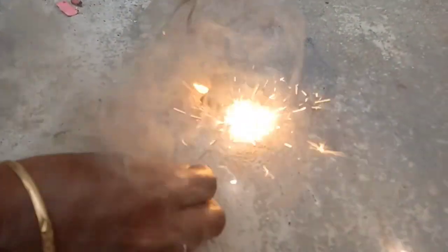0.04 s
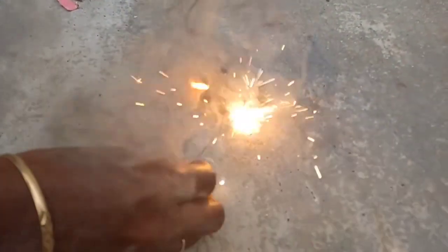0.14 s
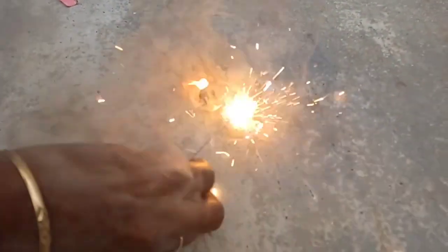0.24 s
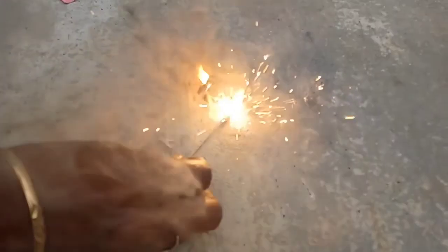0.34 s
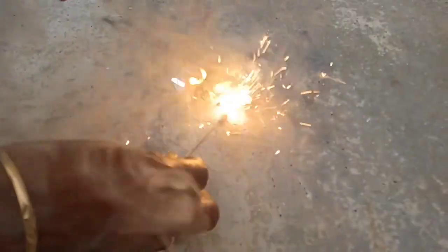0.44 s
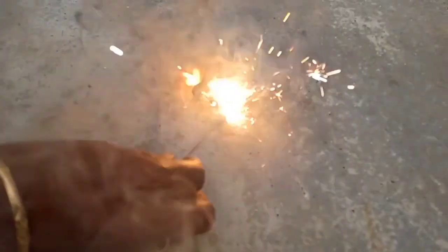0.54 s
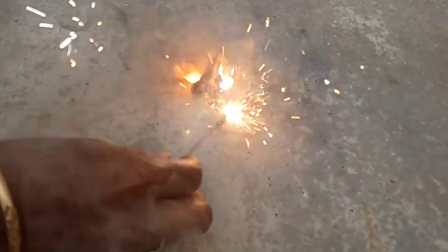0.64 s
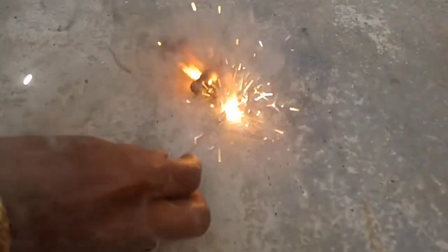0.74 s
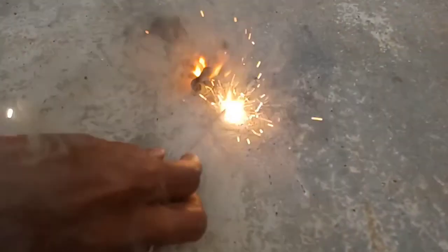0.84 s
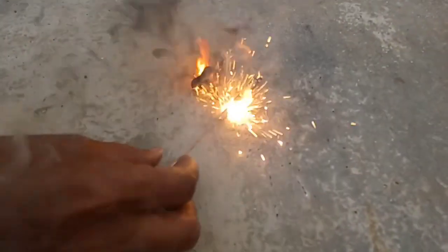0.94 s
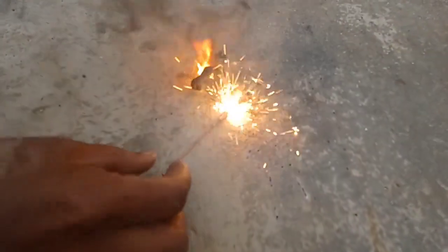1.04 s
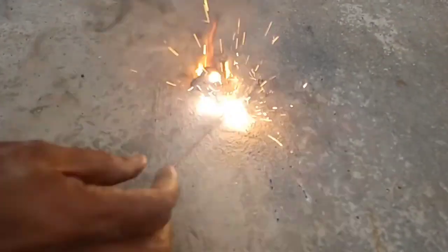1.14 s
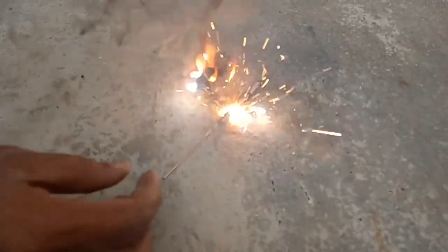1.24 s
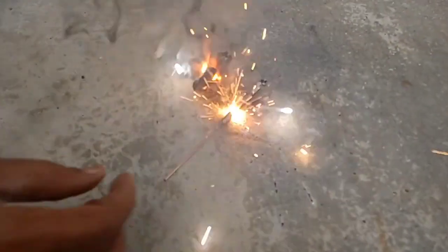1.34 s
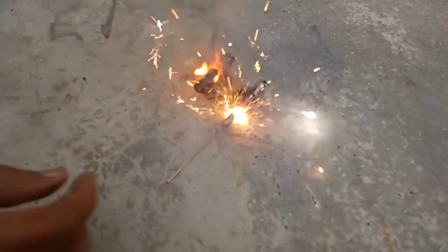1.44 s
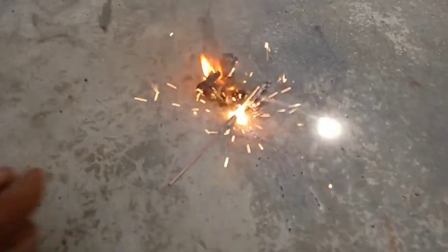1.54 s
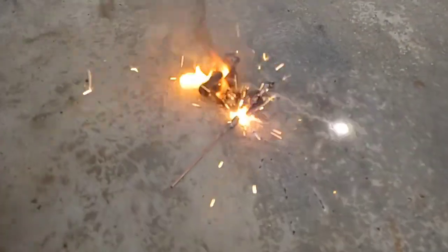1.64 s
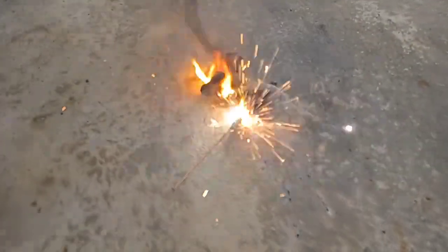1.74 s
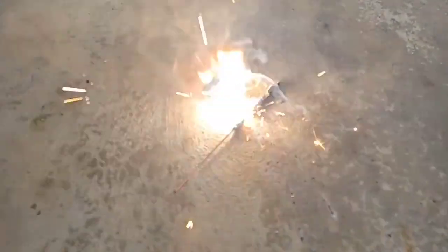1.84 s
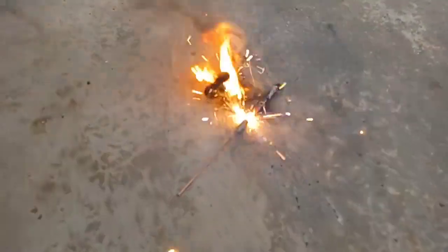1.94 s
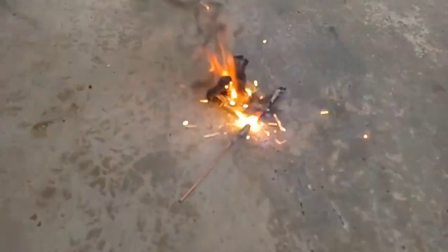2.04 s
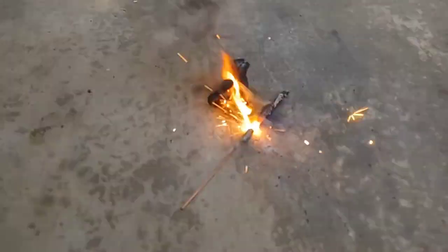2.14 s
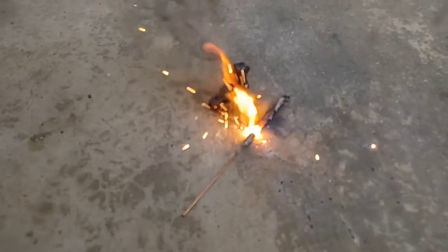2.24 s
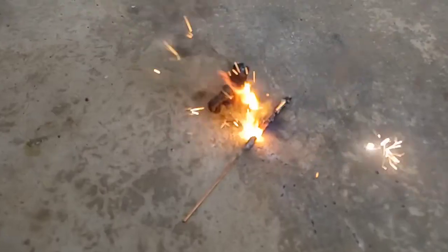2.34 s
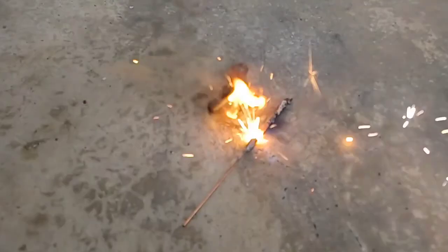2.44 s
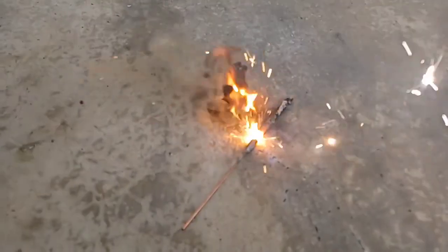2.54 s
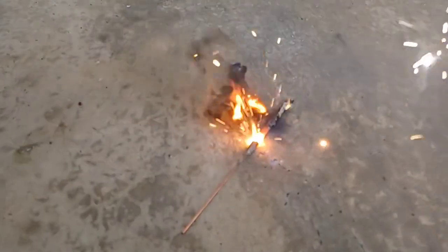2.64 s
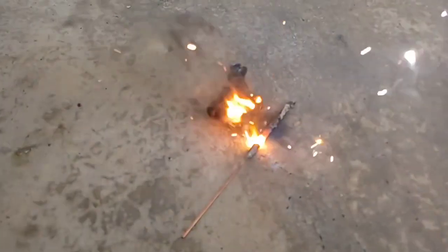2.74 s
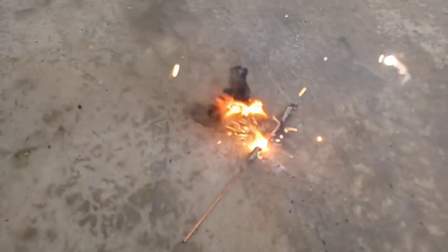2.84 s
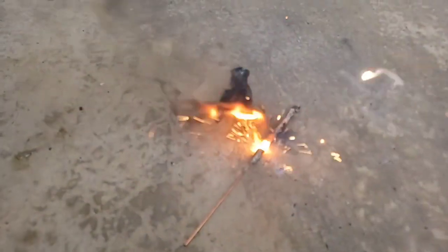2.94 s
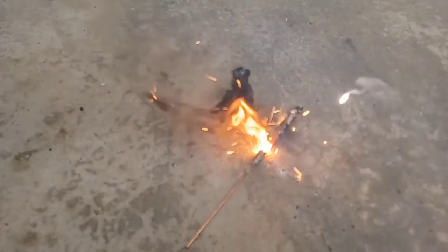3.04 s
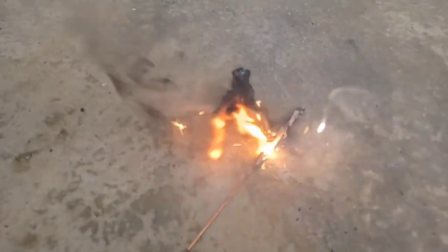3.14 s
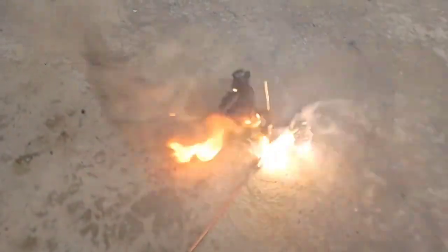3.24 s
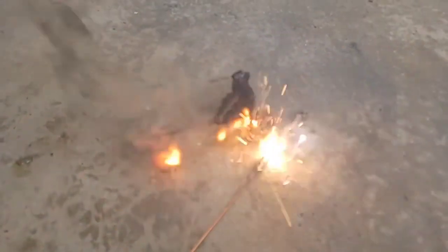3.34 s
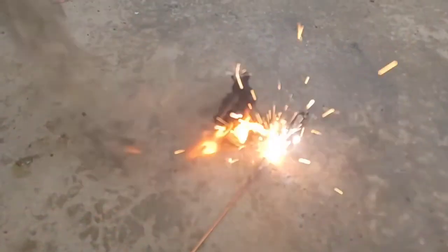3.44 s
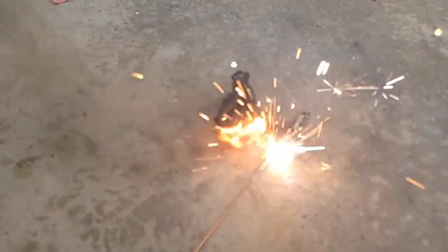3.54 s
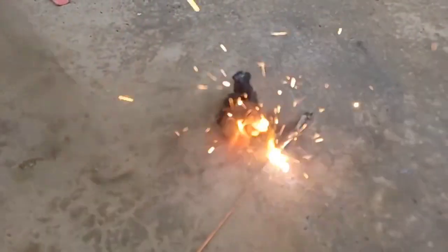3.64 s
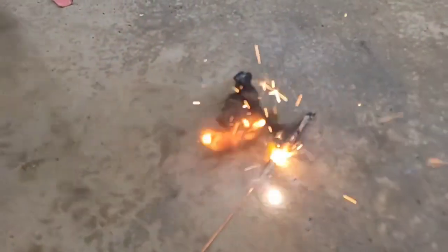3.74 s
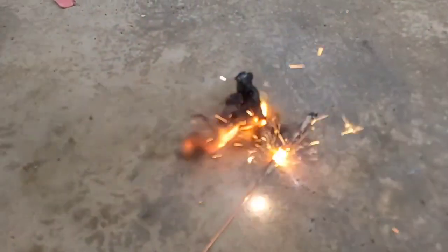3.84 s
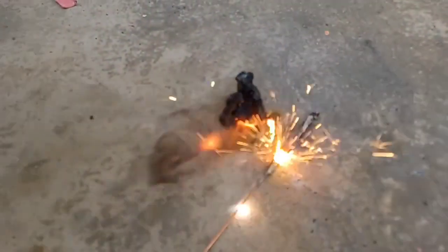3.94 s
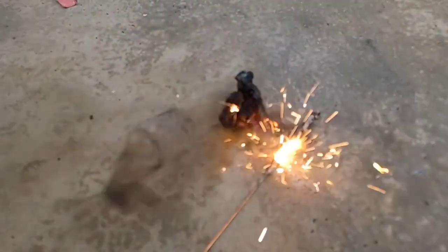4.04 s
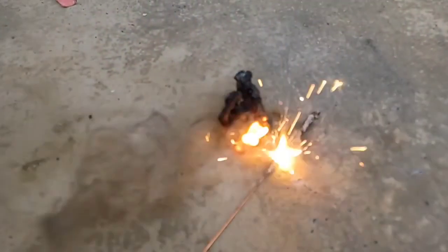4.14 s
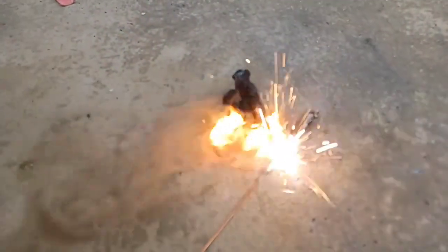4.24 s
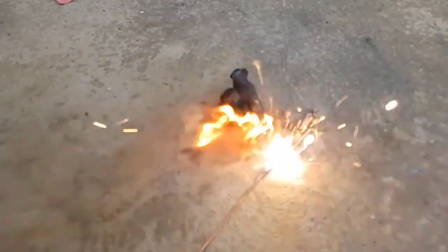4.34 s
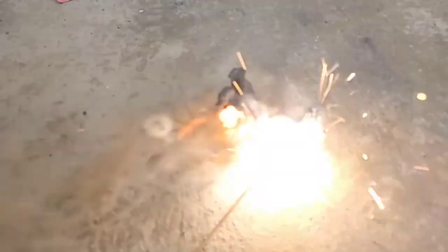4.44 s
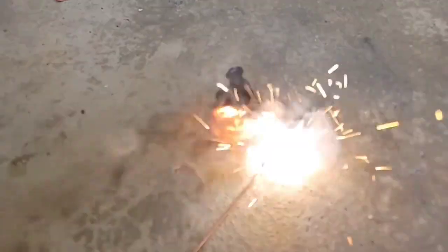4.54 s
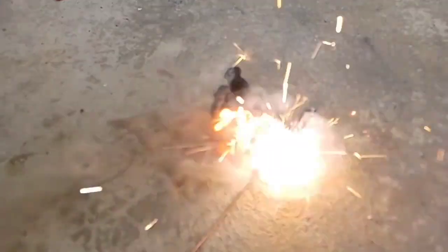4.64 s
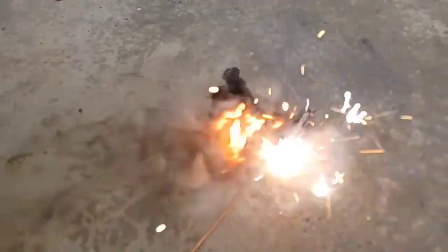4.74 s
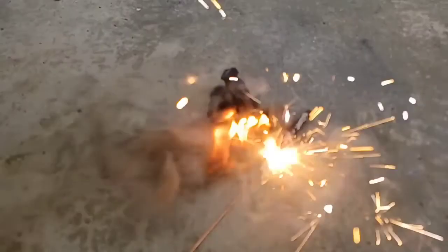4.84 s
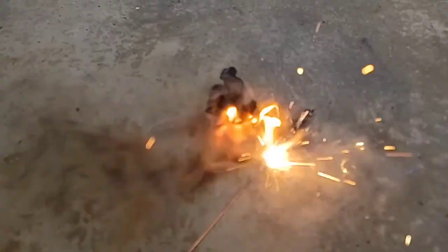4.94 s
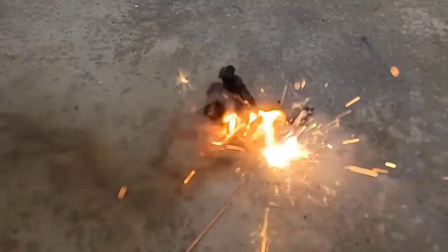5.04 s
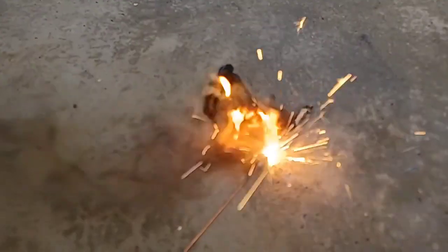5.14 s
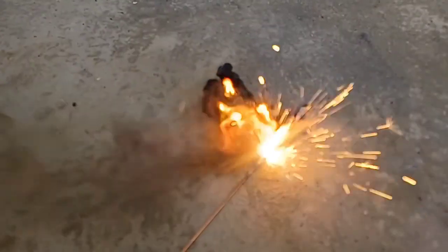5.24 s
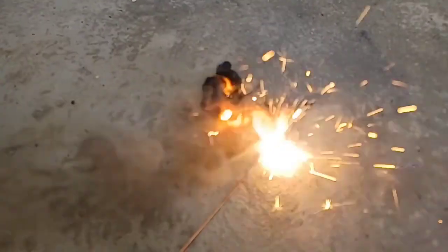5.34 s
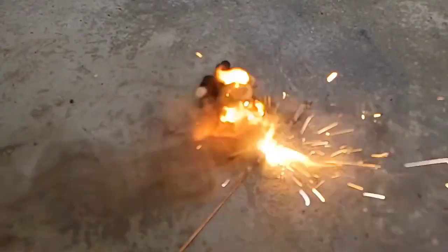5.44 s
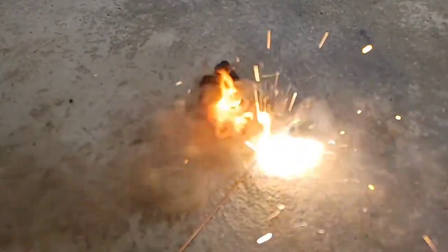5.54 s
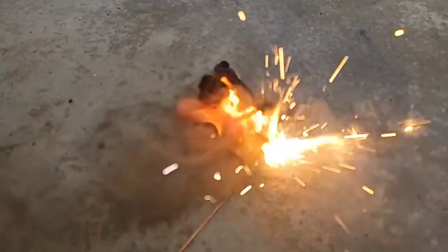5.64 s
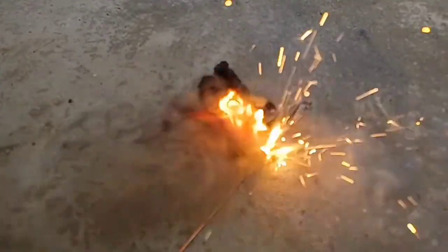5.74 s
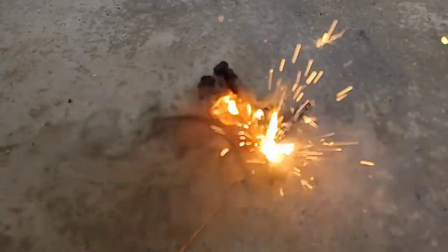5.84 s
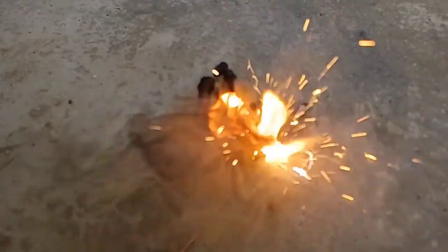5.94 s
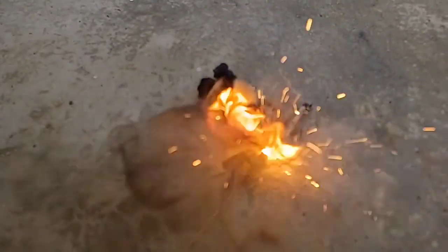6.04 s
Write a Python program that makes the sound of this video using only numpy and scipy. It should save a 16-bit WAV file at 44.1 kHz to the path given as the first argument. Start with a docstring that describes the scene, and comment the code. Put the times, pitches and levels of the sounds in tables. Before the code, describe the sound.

Close, busy crackling and quick surges of hiss come from a sparkler and a small firework burning on concrete in the open air. Sharp pops pepper the start, thin out for a quieter moment, then return as the fizz builds into a longer flare. Now and then a spark hits near the microphone with a dull thump. A faint low wind runs below the continuous crackle.

```python
"""Sparkler on a concrete floor

A sparkler spits and crackles close to a two-port microphone. Its coat glows, flares and hisses;
metal grains burst as tiny pressure pulses, singly and in flurries, and the floor and walls reflect them.
Each port colours the sound in its own way. Now and then a spark lands by one port with a thump;
light wind rumbles below."""
import sys
import numpy as np
from scipy import signal
from scipy.io import wavfile
from scipy.ndimage import uniform_filter1d, minimum_filter1d

SR = 44100
rng = np.random.default_rng(int(sys.argv[2]) if len(sys.argv) > 2 else 0)


def int16_out(signal):
    """Quantize to a 16-bit WAV file."""
    q = np.round(np.clip(np.atleast_2d(signal).T, -1, 1) * 32767)
    wavfile.write(sys.argv[1], SR, q.astype(np.int16))


N = 268128

# Loud grain bursts: start_s, level_db, heavy_push_db, leftward_pan_db
LOUD_POPS = [(0.019, -2.5, -58, -0.5), (0.068, -6, -25, -1), (0.245, -4.5, -38, 6), (0.282, -3.5, -35, -9),
             (0.357, -10.5, -56, 14), (0.468, -13, 11, -1), (0.605, -12, -40, 0), (0.69, -11.5, 1, 5),
             (0.763, -3, -18, 1), (0.774, -8, -8.5, 5), (0.799, 1, -18.5, 4), (0.859, -3.5, -36, -1),
             (0.99, -9, -25, 0), (1.028, -2.5, -4.5, -0.5), (1.094, -8.5, 2.5, 1), (1.115, 4, -29, 13),
             (1.169, -3, -12, 0), (1.22, -1.5, -40, 9), (1.286, -5, -11.5, 3), (1.318, -9, -22, 9.5),
             (1.384, -9, -10.5, 3.5), (1.457, 1.5, -32, 11), (1.588, -18, -2, 5.5), (1.634, -3, -17.5, 5),
             (1.672, -7, -14.5, -1), (1.782, -20, -2, 8), (1.8, -2.5, -14.5, 3), (1.886, -0.5, -57, 12),
             (1.965, -8.5, -31, 8), (2.299, -6.5, -37, -2.5), (2.365, -13, -23.5, 4.5),
             (2.445, -17, -25, -6), (2.614, -14, -53, 10), (2.934, -16, -44, 13.5), (3.192, -20.5, -19, 0),
             (3.233, -7.5, -27, 18), (3.275, -8, -53, 15), (3.324, -11.5, -10, 3.5), (3.388, -14, -36, 21),
             (3.454, -4.5, 26, 13), (3.466, -17.5, 9, 3), (3.542, -9.5, -18, -1), (3.586, -8.5, -11, -3.5),
             (3.599, 1, -26, -1), (3.652, 2, -25, 11), (3.661, -2, -17, -12), (3.985, -14, -10, 4),
             (4.042, -4, -16, 16), (4.052, -3.5, -25, -7), (4.206, -11, -13, 7), (4.341, -10, -10, 7),
             (4.453, -2.5, -10, 5), (4.538, -10.5, -50, 20), (4.593, -16, -57, 27), (4.659, -21, -1, 10),
             (4.738, -6.5, -15.5, -1), (4.761, -2, -25, 3), (4.789, -4, -47, 15), (4.824, -5, -26, 23),
             (4.869, -4, -1, -6), (4.888, -5, -6.5, 11), (4.963, -17, -14, 6), (5.059, -10, -20, -2),
             (5.113, -9, -7, 11), (5.134, -9, -28.5, 20.5), (5.263, -18.5, -43, 11), (5.304, -20, -31, 15),
             (5.363, -8, -23, 11), (5.538, -13.5, -14, 9.5), (5.562, -4.5, -28, 2.5),
             (5.408, -12.5, -30, 10), (5.634, -11, -17, 15), (5.768, -18.5, -46, 4), (5.874, -23, 3, 4),
             (5.989, -4.5, -13, 4)]
# Frequency response of the left port: frequency_hz, gain_db
LEFT_RESPONSE = [(100, -12), (500, -7), (680, 2), (850, 0), (1250, 0), (2200, -4.5), (2800, -9), (3200, -1),
                 (3700, -8), (4600, 0.5), (5250, -2), (5800, -10.5), (6300, -18.5)]
# Effect of the burning tip's position: time_s, leftward_pan_db, low_ring_db, high_ring_db
TIP_PATH = [(0.0, -0.5, -15, -2), (1.08, -0.5, -30, -15.5), (1.34, 1, -31, -12.5), (1.85, 1.5, -12, -7.5),
            (3.4, 1, -8.5, -4), (4.42, 1, 2.5, -16), (4.86, 1, -1.5, -17), (5.37, 5.5, -3.5, 4),
            (5.79, 0.5, 2.5, -11), (6.08, 1.5, 10, -19)]


def gain_of(db):
    """Amplitude ratio of a level in decibels."""
    return 10 ** (np.asarray(db) / 20)


def unit_rms(x):
    """Normalisation to an rms of 1."""
    return x / np.sqrt(np.mean(x ** 2) + 1e-20)


def curves(rows):
    """Linear interpolation of each column over the times in the first."""
    times, *columns = np.transpose(rows)
    return [np.interp(np.arange(N) / SR, times, column) for column in columns]


def minimum_phase(response, size=4096):
    """Causal impulse response: its phase follows from the log magnitude by the Hilbert transform."""
    points_hz, db = np.transpose(response)
    hz = abs(np.fft.fftfreq(size, 1 / SR))
    log_gain = np.interp(np.log(hz + 1), np.log(points_hz + 1), db) * np.log(10) / 20
    return np.fft.ifft(np.exp(np.conj(signal.hilbert(log_gain)))).real[:size // 2]


def pan_gains(pan_db):
    """A level difference split evenly between left and right."""
    return gain_of(np.array([pan_db / 2, -pan_db / 2]))


def blast_wave(push_s):
    """A bursting grain radiates compression, then rarefaction; the pulse has unit energy."""
    u = np.arange(400) / SR / push_s - 1
    wave = (1 - u) * np.exp(-u ** 2 * 0.91)
    wave = wave - wave.mean() * np.exp(-np.arange(400) / 200) * 2  # slow suction offsets the net push
    return wave / np.linalg.norm(wave)


def loud_pops():
    """Impulsive point sources: a sharp tick on a heavier push, scaled by the peak at the left port."""
    out, left_port = np.zeros((2, N + 800)), minimum_phase(LEFT_RESPONSE)[:300]
    for (start_s, db, heavy_db, pan_db), spot in zip(LOUD_POPS, rng.random((len(LOUD_POPS), 4))):
        wave = gain_of(heavy_db + 3.0) * blast_wave(0.000073 + 0.00045 * spot[3])
        wave[8:10] += np.array([1, -.9])  # the tick
        pair = np.outer([1, gain_of(3.5 - pan_db)], np.pad(wave, (0, 200)))
        pair = direct_and_floor(pair, spot)
        pair = pair / abs(np.convolve(pair[0], left_port)).max()
        at = round((start_s + 0.001627) * SR)
        out[:, at:at + pair.shape[1]] += gain_of(db + pan_db / 2 - 2.0) * pair
    return out[:, :N]


def burning_coat(swell_db=31.5, decay_db_per_s=238, glow_heavy_db=-5):
    """Glow and flares add in power; gives the fine grains' level and the heavy ones' relative to it."""
    # Glow between the flares: time_s, level_db
    glow = [(0, -34.5), (.8, -54.5), (.96, -64), (1.3, -39.5), (1.74, -45), (2.03, -43), (2.27, -48),
            (2.45, -37), (2.8, -48), (3.9, -46.5), (4.15, -65), (5.0, -42), (5.22, -46.5), (6.08, -48)]
    # Flares of the coat: full_at_s, swell_s, hold_s, level_db, heavy_relative_db
    flares = [(0.0, .02, 0.022, -26, -8), (0.186, 0.092, 0.03, -27.5, -6.5),
              (0.253, 0.059, 0.022, -21, -6.5), (0.369, 0.17, 0.053, -24, -6),
              (0.526, 0.11, 0.0065, -18.5, -6), (0.603, 0.016, 0.0084, -17, -11),
              (0.688, 0.0032, 0.0046, -19, -3), (0.754, 0.027, 0.013, -24.5, -15),
              (0.861, 0.034, 0.0058, -19, -11.5), (0.993, 0.051, 0.0041, -25, -8),
              (1.03, 0.0068, 0.0075, -17, -8.5), (1.11, 0.021, 0.006, -16.5, -6.5),
              (1.165, .04, 0.014, -21.5, -5), (1.245, 0.031, 0.0071, -29, -2),
              (1.314, 0.025, 0.0079, -33.5, -5), (1.464, 0.14, 0.0065, -30, -6.5),
              (1.612, 0.049, 0.0095, -24.5, -15), (1.806, 0.071, 0.086, -19.5, -8),
              (1.963, 0.051, 0.013, -32.5, -4), (2.372, 0.035, 0.034, -37.5, 1),
              (3.193, 0.019, 0.016, -30.5, -1), (3.24, 0.044, 0.045, -28, -5.5),
              (3.393, 0.085, 0.014, -33.5, 5), (3.455, 0.022, 0.034, -30.5, 8),
              (3.548, .05, 0.016, -30.5, 1), (3.599, 0.01, 0.016, -22, -2.5),
              (3.985, 0.036, 0.032, -35.5, 0), (4.04, 0.03, 0.0022, -18, -10.5),
              (4.248, 0.25, 0.014, -30.5, 4.5), (4.383, 0.18, 0.04, -26.5, 0.5),
              (4.507, 0.13, 0.021, -23.5, -4), (4.6, 0.039, 0.14, -27.5, 0),
              (4.751, 0.035, 0.14, -24.5, -3), (5.058, 0.11, 0.024, -27, -4),
              (5.307, 0.043, 0.0061, -31.5, -4), (5.357, 0.013, 0.08, -23.5, -7.5),
              (5.546, 0.027, 0.031, -34, 2), (5.642, 0.12, 0.0036, -23, -1.5),
              (5.885, 0.041, 0.022, -29, -3)]
    t, steps = np.arange(N) / SR, np.arange(0, N / SR + .01, .002)
    full_s, swell_s, hold_s, db, heavy_db = np.transpose(flares)[:, :, None]
    rise_db = swell_db * np.minimum(steps - full_s, 0) / swell_s
    flare_db = db + rise_db - decay_db_per_s * np.maximum(steps - full_s - hold_s, 0)
    glow_db = curves(glow)[0]
    fine = gain_of(2 * glow_db) + np.interp(t, steps, gain_of(2 * flare_db).sum(0))
    heavy = gain_of(2 * (glow_db + glow_heavy_db))
    heavy += np.interp(t, steps, gain_of(2 * (flare_db + heavy_db)).sum(0))
    return 10 * np.log10(fine), 10 * np.log10(heavy / fine)


def flurry_power(below_db=23, decay_s=0.01):
    """Each loud pop sets off crackle whose power decays exponentially."""
    kicks = np.zeros(N)
    for start_s, db, _, _ in LOUD_POPS:
        kicks[round(start_s * SR)] += gain_of(2 * (db - below_db))
    return signal.lfilter([1], [1, -np.exp(-1 / (decay_s * SR))], kicks)


def crackle(level_db, heavy_db, fine_per_s=2500, heavy_per_s=500, spot_count=10):
    """Shot noise of fine and heavy grains from many spots; a weak flame throws even, small grains."""
    level = np.sqrt(gain_of(2 * (level_db - 1.0)) + flurry_power())
    spread_db = 5.0 * np.clip((level_db + 62.5) / 22, .3, 1)
    chance, spot_of = rng.random((2, N)), rng.integers(0, spot_count, N)
    size = gain_of(spread_db * (np.minimum(rng.exponential(1, (2, N)), [[5.0], [4.0]]) - 2.0))
    fine = size[0] * (chance[0] < fine_per_s / SR) * level * gain_of(16.0)
    heavy = size[1] * (chance[1] < heavy_per_s / SR) * level * gain_of(heavy_db + 16.5)
    out, pan = np.zeros((2, N)), pan_gains(curves(TIP_PATH)[0] - 2.5)
    for k, spot in enumerate(rng.random((spot_count, 4))):
        ticks = signal.lfilter([1, -.6], [1], fine * (spot_of == k))  # small grains carry little bass
        pushes = signal.oaconvolve(heavy * (spot_of == k), blast_wave(0.00025 + 0.00056 * spot[3]))[:N]
        out += direct_and_floor((ticks + pushes) * pan, spot)
    return out


def port_thumps(crack_hz=5100, crack_t60_s=0.0057, final_hz=19):
    """Damped oscillation: a spark cracks a port's cavity; the knocked diaphragm swings ever slower."""
    # Sparks landing by a port: start_s, level_db, sweep_hz, t60_s, crack_relative_db, port (0 is left)
    landings = [(.069, -6.5, 84, 0.29, 7.5, 0), (4.454, -11.5, 85, 0.17, 5.5, 0),
                (5.136, -12, 80.5, 0.29, 10.5, 0), (5.57, -8.5, 84, 0.32, 9.5, 0),
                (5.36, -28, 84, 0.15, -10, 1), (5.926, -18, 85, 0.145, -13, 1)]
    out, t = np.zeros((2, N + SR)), np.arange(SR // 2) / SR
    crack = gain_of(-60 * t / crack_t60_s) * np.sin(2 * np.pi * crack_hz * t)
    for start_s, db, sweep_hz, t60_s, crack_db, port in landings:
        cycles = .13 + np.cumsum(final_hz + sweep_hz * np.exp(-t / .0095)) / SR
        attack = 1 - np.exp(-t / 0.00067)
        swing = attack * gain_of(-60 * t / t60_s) * np.sin(2 * np.pi * cycles)
        at = round(start_s * SR)
        out[round(port), at:at + len(t)] += gain_of(db) * (gain_of(crack_db) * crack - swing)
    return out[:, :N]


def bright_bursts(tick_s=0.0005, puff_s=0.0052, puff_db=-22, dulling=1.6, pan_db=12):
    """Noise bursts from about 7 kHz up: a tick in a short puff, the fainter the duller, mostly left."""
    # Thin bright bursts above the crackle: centre_s, level_db
    bursts = [(0.3566, -58), (0.6898, -46), (0.866, -40), (1.1154, -34), (1.1707, -37.5), (1.2216, -46),
              (1.3264, -46), (1.6227, -46), (3.231, -45.5), (3.3872, -53), (3.6456, -39), (4.043, -32.5),
              (4.4536, -44), (4.789, -31.5), (5.135, -33), (5.5692, -48), (5.99, -28.5)]
    out, t = np.zeros((2, N + SR)), abs(np.arange(-1000, 1000)) / SR
    envelope = np.exp(-t / tick_s) + gain_of(puff_db) * np.exp(-t / puff_s)
    for (centre_s, db), noise in zip(bursts, rng.standard_normal((len(bursts), 2, len(t)))):
        band = minimum_phase([(6000, -54), (6900, 3), (16000, -8 + dulling * (db + 26.5))])
        spit = signal.oaconvolve(noise * envelope, band[None], axes=1)
        spit = spit / abs(spit).max()
        at = round(centre_s * SR) - len(t) // 2
        out[:, at:at + spit.shape[1]] += gain_of(db) * pan_gains(pan_db)[:, None] * spit
    return out[:, :N]


def flame_hiss(level_db):
    """The flame's broadband noise, tilted to the treble and uncorrelated between the ports."""
    hiss = signal.lfilter([1, -.7], [1], rng.standard_normal((2, N)))
    return gain_of(level_db + 0.5) * pan_gains(curves(TIP_PATH)[0] - 2.5) * hiss


def direct_and_floor(pair, spot, mean_lag_s=.00042):
    """Path differences set by the spot: the right port hears later, and each gets a floor reflection."""
    lag = round((mean_lag_s + .0003 * (spot[0] - .5)) * SR)
    taps = np.zeros((2, 200))
    taps[0, 0] = taps[1, lag] = 1
    taps[0, round(14 + 25 * spot[1])] += .5
    taps[1, lag + round(18 + 30 * spot[2])] += .9
    return signal.oaconvolve(pair, taps, axes=1)[:, :N]


def wall_echoes(x, t60_s=0.026, patterns=3, shift_hz=1.3):
    """Sparse early reflections of random sign; their patterns crossfade as the sparks fly about."""
    out, phase = np.zeros((2, N)), 2 * np.pi * shift_hz * np.arange(N) / SR
    for k in range(patterns):
        delays = np.arange(260, 6000, 20) + rng.integers(0, 20, (2, 287))
        echoes = rng.choice([-1., 1.], delays.shape) * gain_of(-60 * delays / SR / t60_s)
        taps = np.zeros((2, 6020))
        np.put_along_axis(taps, delays, echoes, 1)
        share = np.sqrt(2 / patterns) * np.cos(phase + np.pi * k / patterns)
        out += signal.oaconvolve(x * share, taps / np.linalg.norm(taps[0]), axes=1)[:, :N]
    return signal.lfilter([1, -.75], [1], out)  # rough walls scatter the treble most


def ringing(x):
    """Two resonances that wax and wane as the fire moves."""
    # Low and high resonance: pitch_hz, bandwidth_hz
    resonances = [(3150, 630), (5280, 464)]
    return sum(gain_of(db) * signal.lfilter(*signal.iirpeak(hz, hz / width_hz, SR), x)
               for (hz, width_hz), db in zip(resonances, curves(TIP_PATH)[1:]))


def wind():
    """Low noise, partly coherent between the ports: wind rumble, with the flame's flutter above it."""
    # Strength of the wind: time_s, level_db
    gusts = [(0, -50), (.5, -40.5), (.75, -42.5), (1.0, -47.5), (1.8, -45.5), (2.1, -40.5), (2.35, -39.5),
             (2.7, -50.5), (3.8, -51), (5.4, -45.5), (6.08, -46.5)]
    shared, separate = rng.standard_normal((2, N))
    pair = np.array([shared, .75 * shared + 0.76 * separate])
    rumble = signal.sosfilt(signal.butter(2, [20, 40], "band", fs=SR, output="sos"), pair)
    flutter = signal.sosfilt(signal.butter(1, [48, 105], "band", fs=SR, output="sos"), pair)
    envelope = uniform_filter1d(abs(rumble).mean(0), size=3000)
    rumble = rumble / np.sqrt(envelope + 1e-9)  # gusts press on steadily
    gust_db = curves(gusts)[0]
    return gain_of(gust_db + 3.0) * unit_rms(rumble) + gain_of(0.61 * gust_db - 19.0) * unit_rms(flutter)


def band_limit(x, low_hz=12, high_hz=6550, ceiling=.95, distortion_db=-36):
    """A band-pass, two narrow treble dips and a quick limiter; slight nonlinearity adds fizz above."""
    # Narrow dips in the treble: centre_hz, bandwidth_hz
    treble_dips = [(4870, 242), (6010, 150)]
    lowpass = signal.firwin(161, high_hz, window=("kaiser", 9), fs=SR)
    x = signal.oaconvolve(x, lowpass[None], "same")
    x = signal.sosfilt(signal.butter(1, low_hz, "high", fs=SR, output="sos"), x)
    for hz, width_hz in treble_dips:
        x = signal.lfilter(*signal.iirnotch(hz, hz / width_hz, SR), x)
    limiter_gain = minimum_filter1d(ceiling / np.maximum(abs(x), ceiling), size=61)
    for _ in range(3):
        limiter_gain = uniform_filter1d(limiter_gain, size=21)
    x = x * limiter_gain
    distortion = signal.sosfilt(signal.butter(3, [6900, 8600], "band", fs=SR, output="sos"), x * abs(x))
    return x + gain_of(distortion_db) * distortion


def scene():
    """Superposition: port-coloured sparks, thumps and wind are band-limited together; bright bursts lie above."""
    # Frequency response of the right port: frequency_hz, gain_db
    right_response = [(100, -15.5), (480, -13.5), (680, 4), (820, -14.5), (1170, -4), (1480, -9.5),
                      (2000, -7), (2700, -5), (3100, -3.5), (3900, -6.5), (4600, -9.5), (5250, -11),
                      (5850, -20.5), (6300, -29.5)]
    level_db, heavy_db = burning_coat()
    sparks = crackle(level_db, heavy_db) + loud_pops()
    sparks = sparks + gain_of(-4.5) * wall_echoes(sparks) + flame_hiss(level_db)
    sparks = sparks + ringing(sparks)
    ports = np.array([minimum_phase(LEFT_RESPONSE), minimum_phase(right_response)])
    sparks = gain_of(10.0) * signal.oaconvolve(sparks, ports, axes=1)[:, :N]
    return band_limit(sparks + port_thumps() + wind()) + bright_bursts()


def record(dry, cutoff_hz=16200):
    """A linear-phase low-pass filter removes the highest treble."""
    return signal.oaconvolve(dry, signal.firwin(511, cutoff_hz, window=("kaiser", 9), fs=SR)[None], "same")


dry = scene()
out = record(dry)
int16_out(out)
```